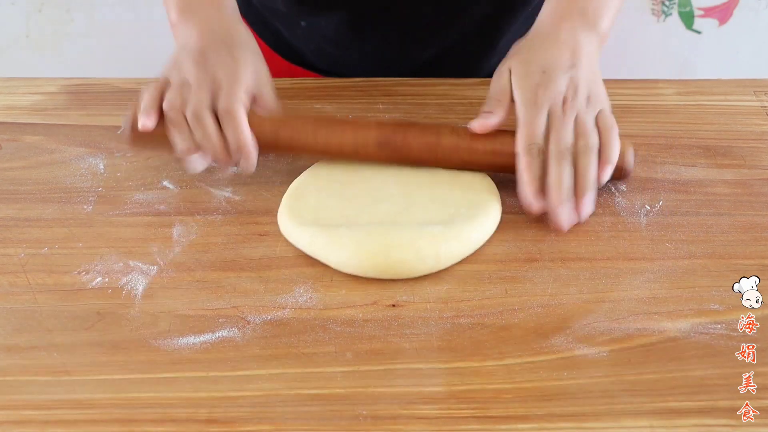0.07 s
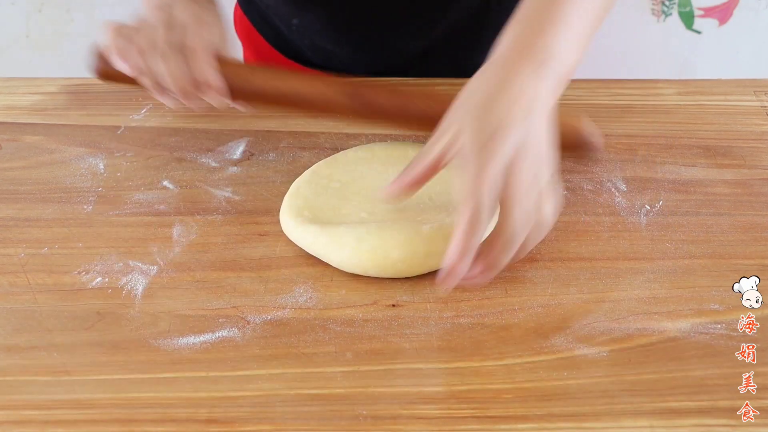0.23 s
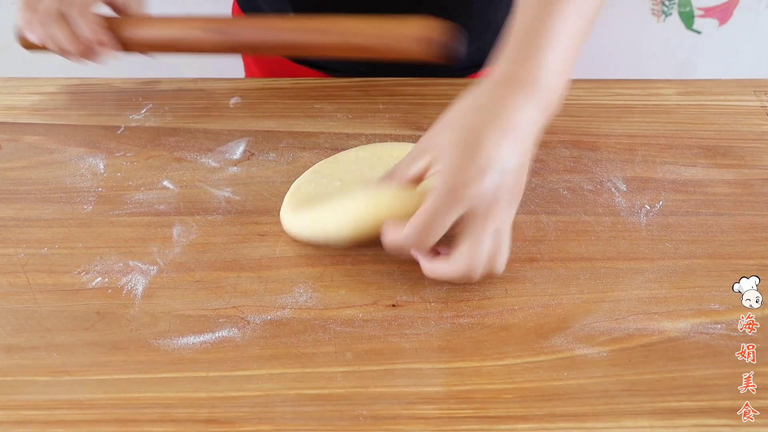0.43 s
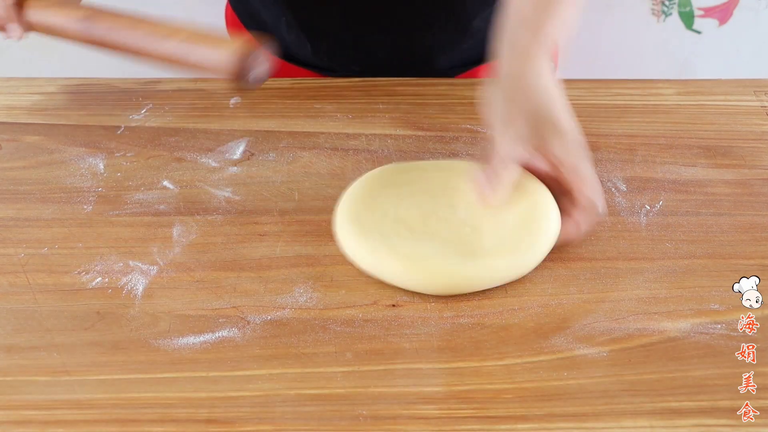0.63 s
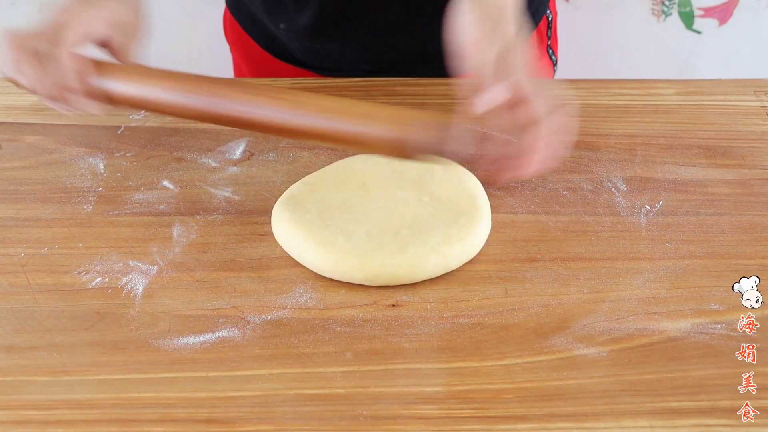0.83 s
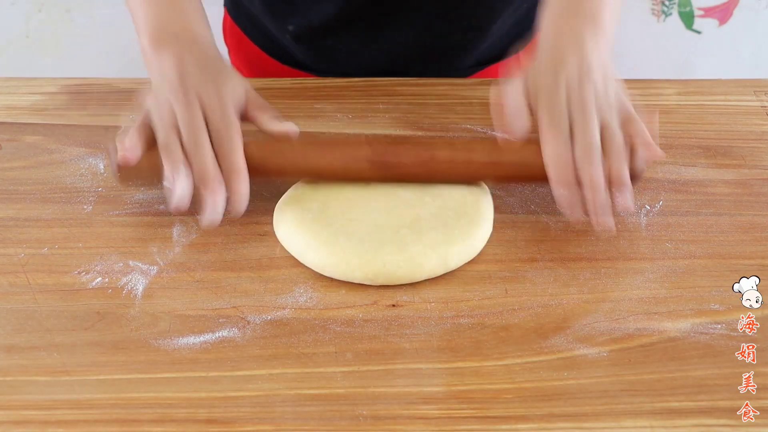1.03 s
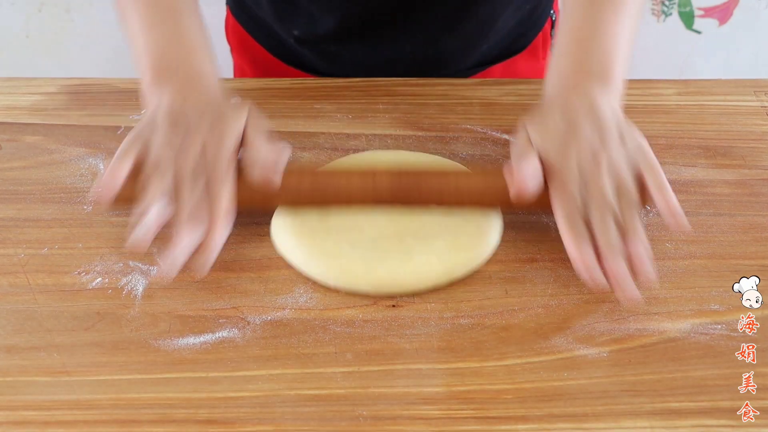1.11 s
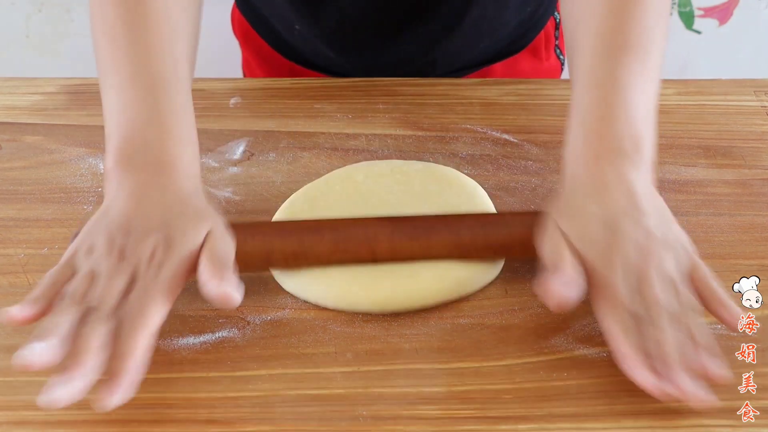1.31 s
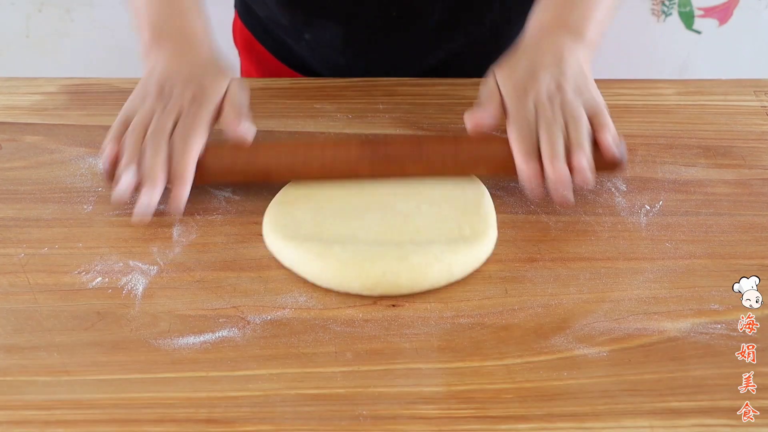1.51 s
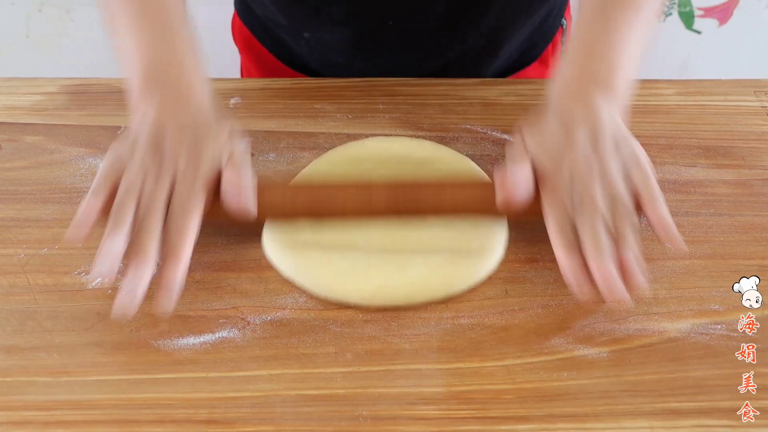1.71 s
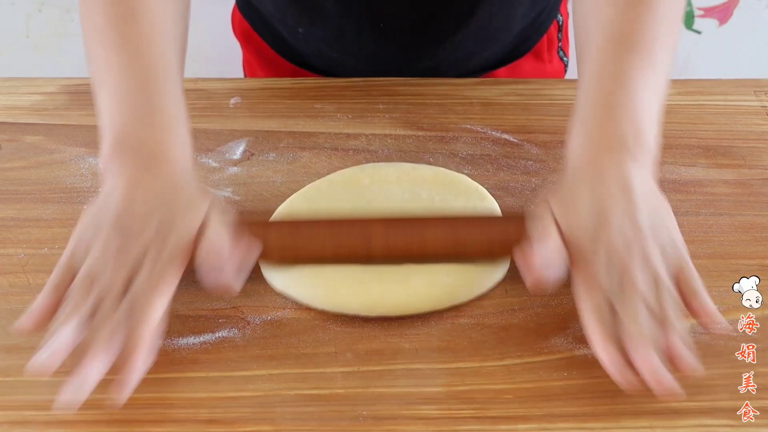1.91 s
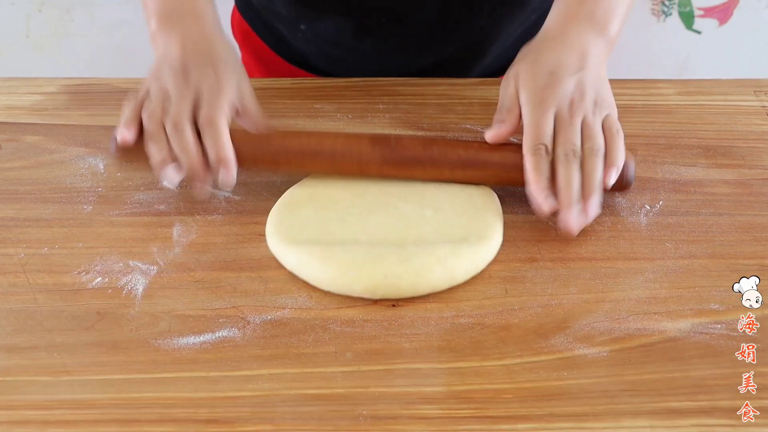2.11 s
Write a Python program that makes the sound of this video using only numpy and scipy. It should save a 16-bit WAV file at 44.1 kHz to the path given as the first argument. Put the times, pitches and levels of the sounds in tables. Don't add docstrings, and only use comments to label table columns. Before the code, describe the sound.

A wooden rolling pin drops on a board with a hard knock and rattling bounces, then floury dough scrapes and hisses under palms, with soft bumps and one lighter knock, in a small quiet kitchen, close microphone.

```python
import sys
import numpy as np
from scipy import signal
from scipy.fft import rfft, irfft, next_fast_len
from scipy.io import wavfile
from scipy.ndimage import map_coordinates

SR = 44100
rng = np.random.default_rng(int(sys.argv[2]) if len(sys.argv) > 2 else 0)


def dump(signal):
    limited = np.clip(np.atleast_2d(signal).T, -1, 1)
    pcm = np.round(limited * 32767).astype(np.int16)
    wavfile.write(sys.argv[1], SR, pcm)


def field_ratio(decibels):
    return 10 ** (np.asarray(decibels, dtype=float) / 20)


N = 94815
T = np.arange(N) / SR

# [f/Hz, t60/s, then level/dB when excited by the pin end, on bare wood by bounce or roll,
# through the dough, at the far edge, by a hand heel or pressed weight]
BOARD_MODES = [(77.5, 0.22, -18, -22, -5.5, -32, -7), (121.36, 0.44, -9.5, -13, -9, -32, 3),
               (196.7, 0.25, -3.5, -8.5, -7.5, -14, -10), (247.8, 0.26, -13.5, -1.5, -14, -20.5, -4),
               (292.4, 0.15, -7.5, -1.5, -13, -9, -25), (344.6, 0.12, -7.5, -0.5, -11, -15.5, -16),
               (425, 0.098, -37, -3.5, -9.5, -9.5, -25), (479.4, 0.19, -36, -8, -17, -6.5, -15),
               (570, .07, 5, -1, -8, -12, 0), (640, 0.18, -6.5, -9, -13.5, -9.5, -11),
               (701.3, 0.083, -3, -5, -3, -11, -13), (900, 0.045, -7, -5.5, -4, 0.5, -13),
               (1062, 0.044, -0.5, -4, -10, 0.5, -4), (1483, 0.018, 3.5, -26, -22, -1, -4)]
PIN_END, BARE_WOOD, THROUGH_DOUGH, FAR_EDGE, HAND_HEEL = 2, 3, 4, 5, 6

# [t/s, level/dB, contact/ms]
HEEL_BLOWS = [
    (0.002, -43, 0.32),
    (.16, -50, 0.31),
    (1.991, -42.5, 0.063),
    (1.997, -38.5, 0.38),
    (2.04, -53, 0.25),
]
# [t/s, level/dB, contact/ms]
PIN_DROPS = [
    (.2255, -17, 0.056),
    (.287, -30, 0.099),
]
# [t/s, level/dB, contact/ms]
PIN_BOUNCES = [
    (.243, -23, 0.16),
    (.256, -28.5, 0.11),
    (.351, -29.5, 0.11),
    (.393, -29.5, 0.21),
    (.407, -48, 0.08),
    (.53, -44.5, 0.41),
]
# [t/s, level/dB, contact/ms]
DOUGH_BLOWS = [
    (1.093, -42.5, 0.041),
    (1.108, -43, 0.083),
    (1.153, -37, 0.044),
    (1.785, -49, 0.056),
]
# [t/s, level/dB, contact/ms]
EDGE_BLOWS = [
    (1.487, -40.5, 0.042),
    (1.4915, -29.5, 0.068),
    (1.503, -39.5, 0.063),
]

# [peak t/s, rise/s, fall/s, level/dB]
PRESSES = [
    (.03, 0.044, 0.063, -53.5),
    (1.2, 0.019, 0.13, -54),
    (1.91, 0.12, 0.079, -53.5),
]
# [peak t/s, rise/s, fall/s, level/dB]
TRUNDLES = [
    (.27, 0.01, 0.042, -42.5),
    (.38, .04, 0.032, -38.5),
    (.5, 0.053, 0.04, -56.5),
]
# [peak t/s, rise/s, fall/s, scrape level/dB, palm hiss over scrape/dB]
SLIDE_STROKES = [(.05, 0.083, 0.064, -52.5, -2), (.205, 0.028, 0.017, -57.5, 7),
                 (.33, 0.0069, 0.029, -41.5, -22), (0.411, 0.038, 0.027, -47, -10.5),
                 (.54, 0.025, .03, -53.5, -10), (.66, 0.028, 0.046, -51, -7), (.69, 0.065, 0.057, -42, -9),
                 (.73, 0.042, 0.03, -52, 8), (.81, 0.052, 0.079, -43, -5.5), (.89, 0.052, 0.027, -46, -22),
                 (.945, 0.014, 0.01, -44.5, -22), (1.12, 0.021, 0.024, -53, 3.5),
                 (1.28, 0.075, 0.087, -47.5, -3), (1.491, 0.0075, 0.063, -44.5, -27),
                 (1.545, 0.011, 0.022, -56, 7), (1.6, 0.037, 0.063, -55.5, -1.5),
                 (1.78, 0.022, 0.036, -47.5, 0), (1.868, 0.028, 0.04, -49, 0),
                 (2.13, 0.058, .06, -48.5, -2.5)]
# [t/s, level/dB, f/Hz, t60/s]
TABLE_SWAYS = [
    (.05, -45, 30.5, .4),
    (.23, -50, 60, .3),
    (.35, -55, 31.6, 0.65),
    (1.111, -30.5, 31.2, 0.83),
    (1.261, -48, 31.2, 0.25),
    (1.58, -43.5, 29.1, 0.83),
    (1.9, -45, 31.5, .5),
]
# [t/s, level/dB, f/Hz, t60/s]
SNAPS_AND_CRACKS = [(.2259, -41.5, 4400, 0.014), (.2259, -41, 2050, 0.052), (.89, -43, 570, 0.34),
                    (0.3197, -30.5, 2040, .01), (0.319, -46, 7600, 0.026), (0.3508, -40, 2620, 0.013),
                    (0.395, -33, 2650, 0.015), (1.9908, -37.5, 800, 0.022), (0.9412, -35, 1860, 0.034),
                    (1.0936, -36, 900, 0.009), (1.1515, -39, 5070, .006), (1.153, -30, 9300, 0.0093),
                    (1.154, -36.5, 3500, 0.021), (1.4594, -36.5, 2380, .01), (1.489, -34, 3180, 0.014),
                    (1.4869, -32.5, 1900, .02), (1.4895, -38, 4200, 0.007), (1.49, -41, 5560, .015)]

# [f/Hz, level/dB per Hz]
SCRAPE_SPECTRUM = [(150, -27), (400, -11), (750, -2), (1200, -6), (2300, -7), (4500, -14.5), (9000, -29),
                   (15000, -48)]
# [f/Hz, level/dB per Hz]
PALM_SPECTRUM = [(1500, -12), (4000, 4), (7500, 5), (11000, 3), (15500, 1.5)]
# [f/Hz, level/dB per Hz]
FLOOR_SPECTRUM = [(20, 2), (60, -1.5), (200, -2.5), (700, -8), (2000, -16.5), (5000, -21), (12000, -27),
                  (16000, -32)]
# [f/Hz, t60/s]
KITCHEN_DECAY = [(100, 0.63), (600, 0.3), (1500, 0.45), (4000, 0.099), (12000, 0.36)]
# [f/Hz, level/dB per Hz]
SELF_SPECTRUM = [(30, 8.5), (300, 0.5), (1000, -10), (3000, -8.5), (8000, -6), (16000, -6)]

FLOOR_DB, ROOM_DB, SELF_DB = -49.5, -5, -70
SPREAD_DB, DETUNE = 1.27, 0.0071
WANDER_RAD = 0.019
CLICK_DB = 2.5
RUMBLE_DB, GRIT_DB = -19, 1.5
SWAY_RISE_S = 0.027
ROUGH_RAD = 0.055
DIP_HZ, DIP_WIDTH_HZ, DIP_DB = 6040, 640, -4.5
TOP_HZ = 15800


def unit(x):
    return x / np.sqrt(np.mean(x ** 2) + 1e-20)


def along(points, hz):
    f, v = np.transpose(points)
    return np.interp(np.log(hz + 1), np.log(f + 1), v)


def wobble(rate):
    knots = rng.standard_normal(int(N * rate / SR) + 4)
    return map_coordinates(knots, [np.arange(N) * rate / SR])


def filtered(x, response):
    m = next_fast_len(N + SR)
    return irfft(rfft(x, m) * response(np.fft.rfftfreq(m, 1 / SR)), m)[..., :N]


def noise(spectrum):
    return unit(filtered(rng.standard_normal(N), lambda hz: field_ratio(along(spectrum, hz))))


def bump(s, rise, fall):
    return np.exp(-((T - s) / np.where(T < s, rise, fall)) ** 2)


def strokes(rows):
    return np.sqrt(sum(field_ratio(2 * db) * bump(s, rise, fall) for s, rise, fall, db in rows))


def ringing(hz, centre_hz, t60):
    centre = 2 * np.pi * centre_hz
    damped = 2j * np.pi * hz + np.log(1000) / t60
    return 2 * centre * SR / 2 / (damped ** 2 + centre ** 2) * 2


def driven(force, axis):
    def board(hz):
        return sum((-1) ** k * field_ratio(m[axis]) * ringing(hz, m[0], m[1]) / np.sqrt(m[1])
                   for k, m in enumerate(BOARD_MODES))

    push = force * rng.standard_normal(N)
    return unit(filtered(push, board)) * np.sqrt(np.mean(force ** 2))


def room_floor():
    return field_ratio(FLOOR_DB) * noise(FLOOR_SPECTRUM)


def board_ring(axis):
    t = np.arange(SR // 3) / SR
    ring = np.zeros(len(t))
    for k, mode in enumerate(BOARD_MODES):
        hz, t60 = mode[:2]
        level = field_ratio(mode[axis] + SPREAD_DB * rng.normal() - 60 * t / t60)
        drift = np.cumsum(WANDER_RAD * rng.standard_normal(len(t)))
        phase = 2 * np.pi * hz * (1 + DETUNE * rng.normal()) * t + drift
        ring += (-1) ** k * level * np.sin(phase)
    ring[:40] += field_ratio(CLICK_DB) * np.hanning(40) * np.sin(np.arange(40) * np.pi / 20)
    return ring


def knocks(blows, axis):
    out = np.zeros(N + SR)
    for s, db, contact_ms in blows:
        ring = board_ring(axis)
        u = np.arange(400) / SR * 1000 / contact_ms
        force = u ** 2 * np.exp(-u)
        struck = signal.fftconvolve(ring, force / force.sum())[:len(ring)]
        out[round(s * SR):][:len(ring)] += field_ratio(db) * struck
    return out[:N]


def board_blows():
    hands = knocks(HEEL_BLOWS, HAND_HEEL)
    pin = knocks(PIN_DROPS, PIN_END) + knocks(PIN_BOUNCES, BARE_WOOD)
    return hands + pin + knocks(DOUGH_BLOWS, THROUGH_DOUGH) + knocks(EDGE_BLOWS, FAR_EDGE)


def kitchen(x):
    hz, t, z = signal.stft(rng.standard_normal(SR // 2), SR, nperseg=256)
    decay = field_ratio(-60 * t / along(KITCHEN_DECAY, hz)[:, None])
    tail = signal.istft(z * decay, SR, nperseg=256)[1]
    return signal.fftconvolve(np.pad(x, (260, 0)), tail / np.linalg.norm(tail))[:N]


def rolling():
    dull = driven(strokes(PRESSES), HAND_HEEL)
    lumps = field_ratio(3.5 * wobble(90.1))
    return dull + driven(strokes(TRUNDLES) * lumps, BARE_WOOD)


def grit():
    return unit(field_ratio(GRIT_DB * wobble(300) + 0.9 * wobble(59.9)))


def slides():
    scrape = strokes([(s, rise, fall, db) for s, rise, fall, db, _ in SLIDE_STROKES])
    palms = strokes([(s, rise, fall, db + over) for s, rise, fall, db, over in SLIDE_STROKES])
    rub = scrape * grit()
    rumble = field_ratio(RUMBLE_DB) * driven(rub, THROUGH_DOUGH)
    return rub * noise(SCRAPE_SPECTRUM) + rumble + palms * grit() * noise(PALM_SPECTRUM)


def table():
    out = np.zeros(N)
    for s, db, hz, t60 in TABLE_SWAYS:
        t = np.maximum(T - s, 0)
        level = field_ratio(db - 60 * t / t60) * (1 - np.exp(-t / SWAY_RISE_S))
        out += level * np.sin(2 * np.pi * hz * t)
    return out


def snaps():
    out, t = np.zeros(N + SR), np.arange(SR // 10) / SR
    for s, db, hz, t60 in SNAPS_AND_CRACKS:
        drift = np.cumsum(ROUGH_RAD * hz / 1000 * rng.standard_normal(len(t)))
        ring = np.sin(2 * np.pi * hz * t + drift)
        burst = 0.22 * field_ratio(-60 * t / 0.0017) * rng.standard_normal(len(t))
        out[round(s * SR):][:len(t)] += field_ratio(db - 60 * t / t60) * (ring + burst)
    return out[:N]


def scene():
    near = board_blows() + rolling() + slides() + snaps()
    mid = near + field_ratio(ROOM_DB) * kitchen(near) + table() + room_floor()
    return np.array([mid, mid])


def roll_off(x):
    return signal.sosfilt(signal.butter(12, 16980, fs=SR, output="sos"), x)


def record(dry):
    def housing(hz):
        return field_ratio(DIP_DB * np.exp(-((hz - DIP_HZ) / DIP_WIDTH_HZ) ** 2))

    hiss = field_ratio(SELF_DB) * np.array([noise(SELF_SPECTRUM), noise(SELF_SPECTRUM)])
    heard = filtered(dry, housing) + hiss
    return roll_off(filtered(heard, lambda hz: hz < TOP_HZ))


dry = scene()
out = record(dry)
dump(out)
```